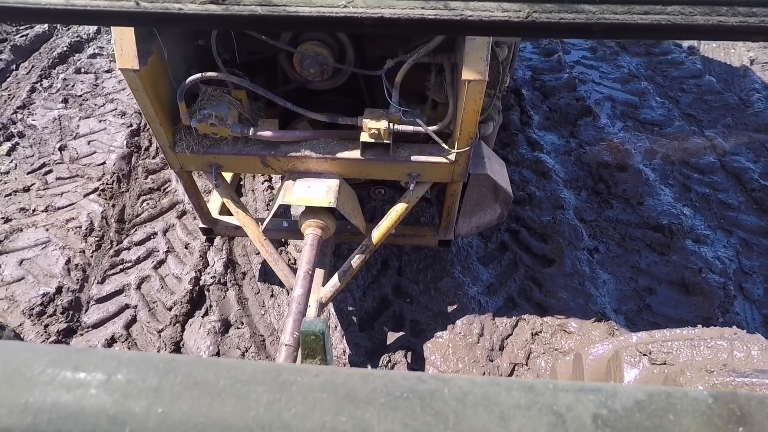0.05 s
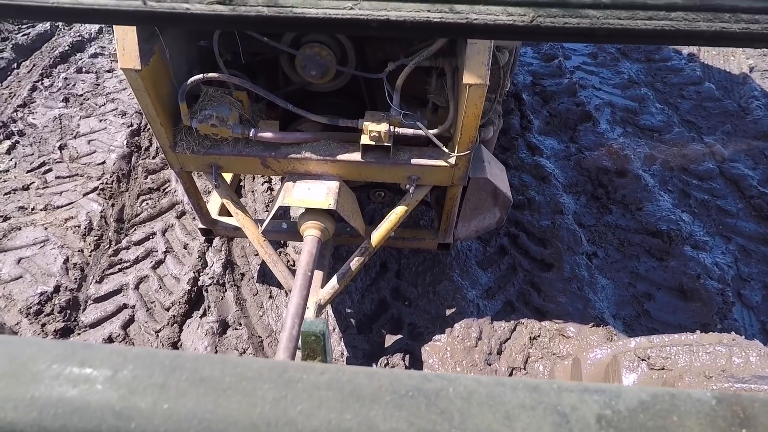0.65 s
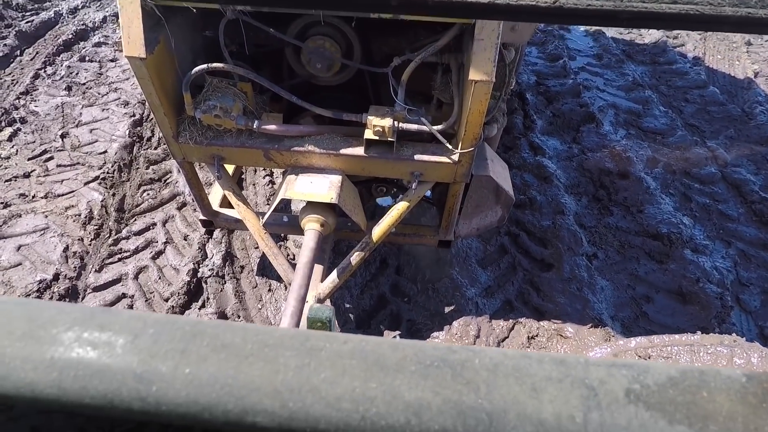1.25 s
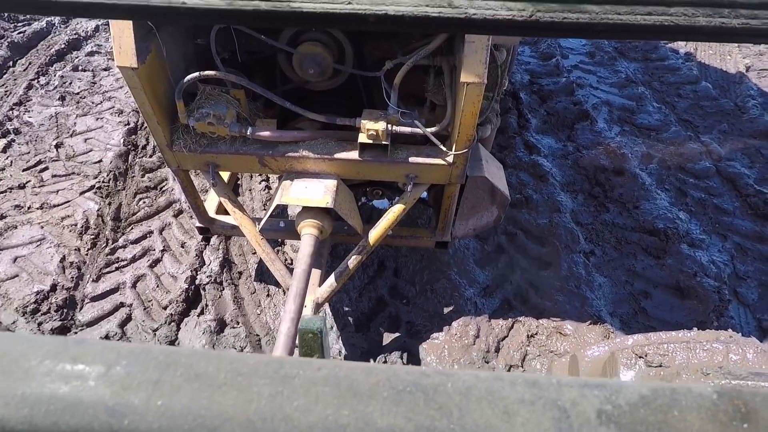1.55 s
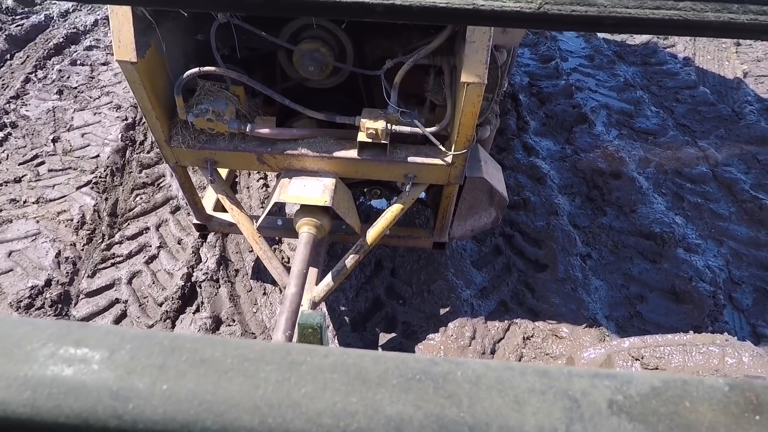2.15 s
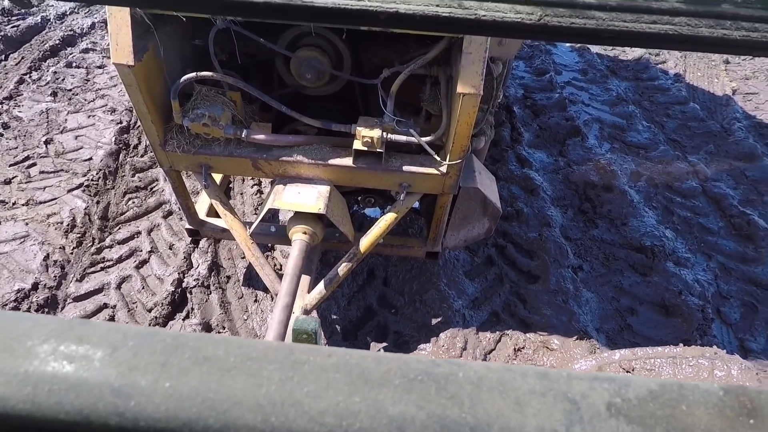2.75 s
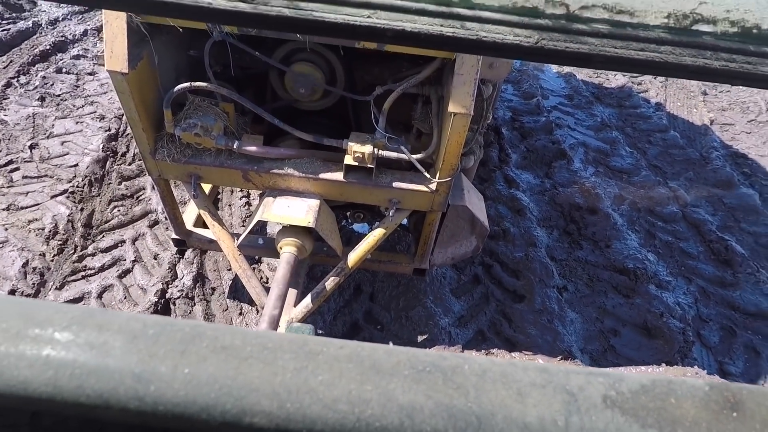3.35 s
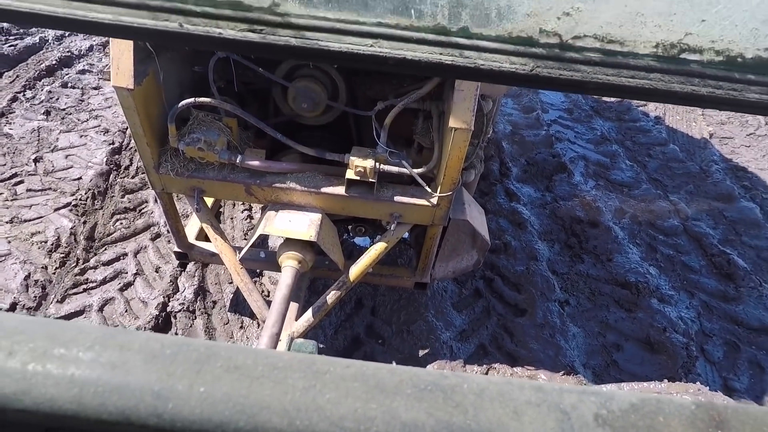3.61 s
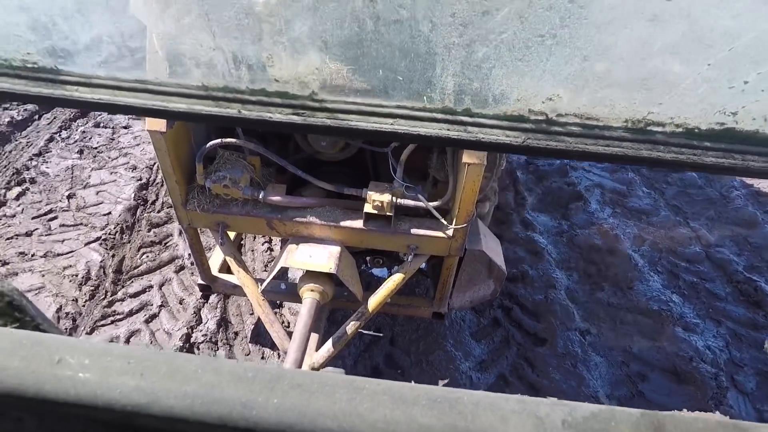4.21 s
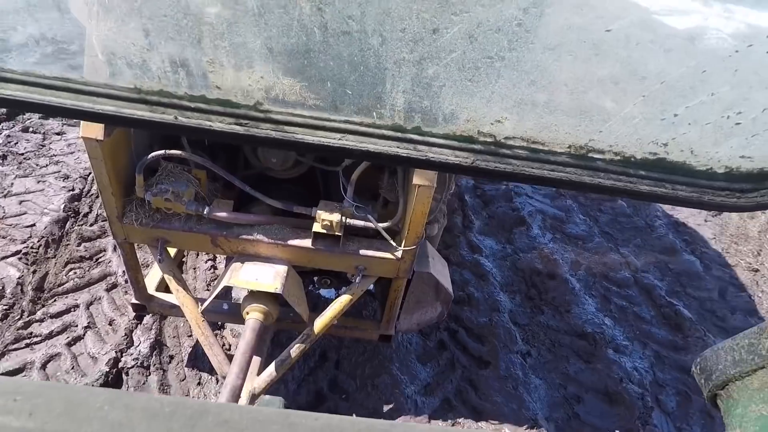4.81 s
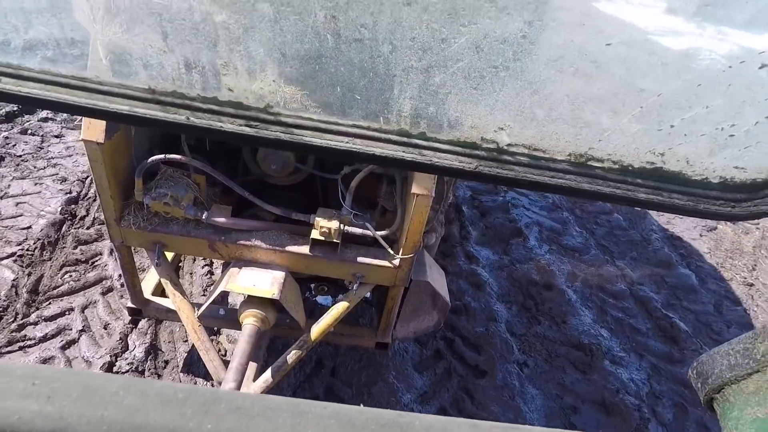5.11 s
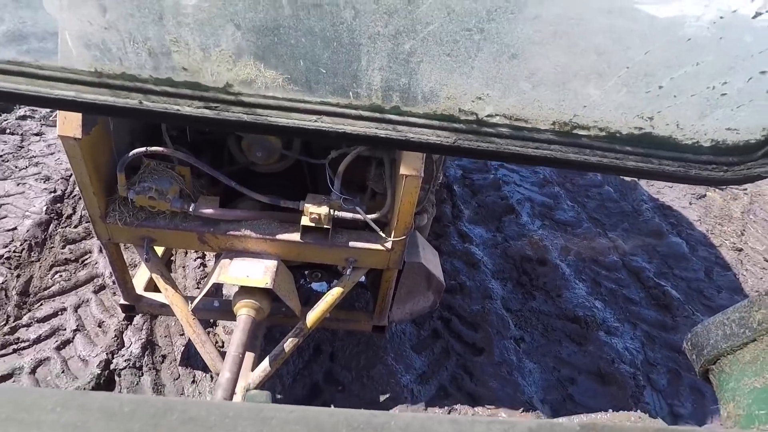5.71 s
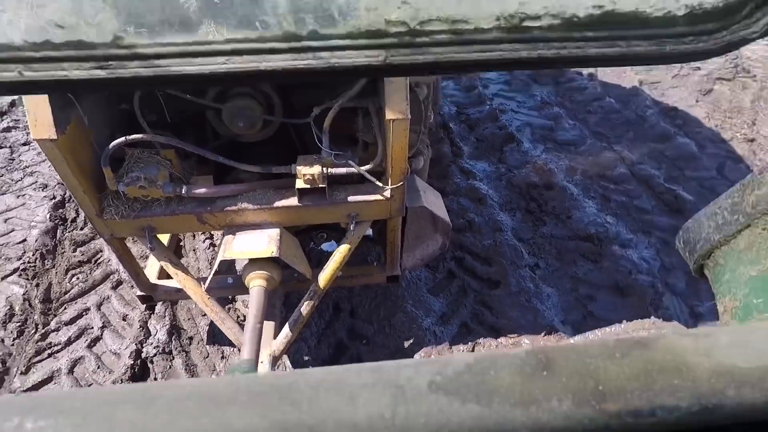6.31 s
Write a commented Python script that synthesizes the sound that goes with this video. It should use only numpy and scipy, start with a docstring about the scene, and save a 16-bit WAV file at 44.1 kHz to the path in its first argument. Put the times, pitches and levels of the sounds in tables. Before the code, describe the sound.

From inside an open-windowed tractor cab, a low diesel drone with fan hum and gear whine labours under the load of a hay grinder. Bursts of crackling chaff and sharp clinks hit the steel housing over a light hiss. Halfway through, the engine dips and picks up again as a rapid, pulsing metal rub sets in. Finally the engine is revved, and the whine and rubbing grow louder.

```python
"""Tractor cab, rear window open: a six-cylinder diesel drives a hay grinder.
The engine sags under load while its turbo winds up, recovers, then is revved. Its orders boom in the
cab, its firings shake panels and block; gear teeth whine and the cooling fan hums.
Hay hisses in the mill; stalks and hard bits crack and clink against the steel.
From halfway on, a turning part of the grinder rubs on its guard once a turn."""
import sys
import numpy as np
from scipy import signal
from scipy.fft import rfft, irfft
from scipy.io import wavfile

SR = 44100
rng = np.random.default_rng(int(sys.argv[2]) if len(sys.argv) > 2 else 0)


def master(y):
    """Save y as 16-bit WAV."""
    cut = np.clip(np.atleast_2d(y).T, -1, 1)
    pcm = np.round(cut * 32767)  # scale
    wavfile.write(sys.argv[1], SR, pcm.astype(np.int16))


N = 284886
T = np.arange(N) / SR

# cab panel spectrum (frequency [Hz], relative level [dB])
CAB_SPECTRUM = [(120, -29), (190, -5.5), (225, 1), (255, -2.5), (310, 2), (355, -4), (440, -7.5),
                (510, -8.5), (580, -20), (900, -30.5), (3000, -70.5)]
# cab resonances (centre [Hz], width [Hz], lift [dB])
CAB_MODES = [(436.5, 30, 2.5), (605, 30, -2), (276, 73, 0.5)]
# grinder housing resonances (centre [Hz], width [Hz], lift [dB])
HOUSING_MODES = [(2658, 90, 4), (3390, 130, 1.5), (3660, 200, -4), (4490, 140, 1), (5470, 280, -3.5),
                 (6000, 74, 5), (7700, 180, 4), (10400, 400, 5.5)]


def exhaust(firing_hz, free_hz=70.74, fade_db_per_hz=2.0, waver_db=1.08):
    """Low engine orders sweep through the cab's resonances; unequal cylinders add half orders."""
    # engine orders (multiple of firing rate)
    orders = [.5, 1, 1.5, 2, 3]
    # strength per order (relative level [dB])
    orders_db = [2.5, 1, -3, -0.5, -9.5]
    # cab boom response (frequency [Hz], gain [dB])
    boom = [(34, -22.5), (47, -33.5), (58, -13.5), (67.5, -25), (73, -15), (88, -16.5), (97, -23),
            (118, -22.5), (129, -14.5), (136, -17), (144, -27.5), (172, -28.5), (190, -19.5), (280, -31)]
    firings, drone = turns_of(firing_hz), np.zeros(N)
    # half orders fade when the engine is dragged below its free speed
    fade_db = np.clip(fade_db_per_hz * (free_hz - firing_hz), 0, 23)
    for k, order_db in zip(orders, orders_db):
        db = order_db + np.interp(k * firing_hz, *np.transpose(boom)) - (fade_db if k % 1 else 0)
        gain = np.sqrt(2) * amp(db + waver_db * wander(4.7))
        drone += gain * np.cos(2 * np.pi * (k * firings + rng.random()))
    return drone


def combustion(firing_hz, effort_db, roar_depth=0.17, clatter_depth=0.13, uneven_db=-0.25):
    """Each firing puffs noise into the cab panels and knocks the block, over a steady rumble."""
    # panel roar by speed (firing rate [Hz], level [dB])
    roar_by_speed = [(57, -20.5), (64, -20), (72, -16), (86, -17), (95, -19.5)]
    # block clatter and rumble spectra (frequency [Hz], relative level [dB])
    clatter_spectrum = [(350, -30.5), (560, -1), (700, 5.5), (800, -4), (1000, -1.5), (1150, 0.5),
                        (1350, -3), (1500, -5), (1800, -9), (2400, -21), (5000, -44.5), (15000, -72)]
    rumble_spectrum = [(8, -51.5), (25, -0.5), (45, -3.5), (80, -10.5), (150, -0.5), (220, -11),
                       (400, -27.5), (900, -66)]
    # block resonances (centre [Hz], width [Hz], lift [dB])
    block_modes = [(1266.5, 59, 8), (1138, 34, 3.5), (1006, 13, 5.5), (700, 54, -3), (608, 32, -5),
                   (1547, 80, -4.5)]
    firings = turns_of(firing_hz)
    crank_turns = firings / 3
    cylinder_gain = amp(uneven_db * (np.cos(2 * np.pi * crank_turns) + np.sin(np.pi * firings)))
    beat = np.cos(2 * np.pi * firings)
    puffs = rng.standard_normal(N) * cylinder_gain * (1 + roar_depth * beat)
    roar_db = np.interp(firing_hz, *np.transpose(roar_by_speed))
    roar = amp(roar_db) * unit(colour(puffs, CAB_SPECTRUM, CAB_MODES))
    one_turn = rng.standard_normal(2048)  # part of the knock repeats every crank turn
    repeating = one_turn[(crank_turns % 1 * len(one_turn)).astype(int)]
    knocks = (rng.standard_normal(N) + amp(-8) * repeating) * cylinder_gain * (1 + clatter_depth * beat)
    clatter = amp(effort_db - 3) * unit(colour(knocks, clatter_spectrum, block_modes))
    rumble = amp(-22) * colour(rng.standard_normal(N), rumble_spectrum)
    return roar + clatter + rumble


def throb(shaft_hz, depth_db=0.73, peak_turn=0.11):
    """Gain swing: the unbalanced grinder shaft loads the engine once a turn."""
    return amp(depth_db * np.cos(2 * np.pi * (turns_of(shaft_hz) - peak_turn)))


def hay(firings, effort_db, contact, trickle_db=-58, shaken_db=-49, edge_s=0.025):
    """The mill hisses; chaff ticks on the housing in clumps, thickest while a wad goes through."""
    # wads of coarse hay (start [s], length [s], chaff level [dB])
    wads = [(0.725, 0.41, -41), (1.355, 0.32, -47), (1.792, 0.27, -43), (3.6, .5, -57)]
    # mill hiss and chaff tick spectra (frequency [Hz], relative level [dB])
    hiss_spectrum = [(1000, -27.5), (2000, -4.5), (2700, 2.5), (3800, -6), (4600, -7), (5400, -11.5),
                     (6500, -21), (8000, -26), (11000, -37.5), (15000, -39.5)]
    tick_spectrum = [(1500, -11.5), (3000, 8), (4500, 6), (6500, -3.5), (7300, -29), (11000, -26.5),
                     (15000, -39.5)]
    chaff_gain = amp(trickle_db) + amp(shaken_db) * contact  # rubbing shakes more loose
    for start_s, length_s, db in wads:
        inside_s = np.minimum(T - start_s, start_s + length_s + edge_s - T)
        chaff_gain += amp(db) * np.clip(inside_s / edge_s, 0, 1)
    beat = 1 + 0.036 * np.cos(2 * np.pi * firings)
    rush = unit(rng.standard_normal(N) * amp(0.5 * wander(35)) * beat)
    ticks = unit(grains(per_s=2800, spread_db=3) * amp(3 * wander(34)))
    hiss = colour(amp(effort_db - 11) * rush, hiss_spectrum, HOUSING_MODES)
    chaff = colour(chaff_gain * ticks, tick_spectrum, HOUSING_MODES)
    return sheet_steel(hiss + chaff, ring_db=-13.5, t60_s=0.048)


def strikes(rise_s=0.0013, t60_s=0.076, thud_db=6):
    """Hard bits hit the housing in a shower of blows, thud through the cab and clink as they skitter."""
    # hard bits (time [s], relative crack level [dB], relative clink level [dB], clink pitch [Hz])
    hits = [(.734, -37, -44, 6170), (.814, -39, -36, 5300), (.897, -29, -36.5, 6130),
            (.992, -42, -35, 4550), (1.088, -37, -46, 6160), (1.233, -31.5, -45, 6400),
            (1.374, -30, -38, 4550), (1.44, -23, -33, 4400), (1.582, -33, -44, 5900),
            (1.617, -40, -42, 4530), (1.85, -20.5, -44, 4500), (1.877, -33, -43, 6050),
            (1.931, -31, -38, 4430), (2.013, -22.5, -37, 4520), (2.018, -28.5, -34, 6160),
            (3.156, -26.5, -41, 5700), (3.19, -32, -37, 4170), (3.348, -26, -39, 4550),
            (3.635, -38, -32, 4420), (3.779, -40, -36, 4450), (3.93, -43, -35, 4820),
            (3.988, -35, -35, 4500), (4.059, -39, -29, 4800)]
    # modes of a bit (multiple of pitch, relative level [dB], t60 [s])
    clink_modes = [(.74, -1, 0.011), (.89, 0, 0.023), (1, 2, 0.036), (1.06, -2, 0.021)]
    # crack spectrum (frequency [Hz], relative level [dB])
    crack_spectrum = [(300, -14), (1200, 13), (2000, -7), (2900, 5), (3700, -3), (4600, 0.5), (6300, -10),
                      (7500, -21), (11000, -20), (15000, -19.5)]
    cracks, clinks, t = np.zeros(N), np.zeros(N), T[:SR // 4]
    blows = grains(per_s=6400, spread_db=0)
    for start_s, crack_db, clink_db, hz in hits:
        span = slice(round(start_s * SR), round(start_s * SR) + len(t))
        shower = blows[span] * amp(-60 * t / t60_s) * (1 - np.exp(-t / rise_s))
        ring = sum(amp(db - 60 * t / mode_t60_s) * np.sin(2 * np.pi * ratio * hz * t)
                   for ratio, db, mode_t60_s in clink_modes)
        ring /= np.linalg.norm(ring)
        cracks[span] += amp(crack_db) * shower
        clinks[span] += amp(clink_db + 3) * signal.fftconvolve(shower, ring)[:len(t)]
    housing = sheet_steel(colour(cracks, crack_spectrum, HOUSING_MODES), ring_db=2, t60_s=0.07)
    thuds = amp(thud_db) * colour(cracks, CAB_SPECTRUM, CAB_MODES)
    return housing + thuds + clinks


def rubbing(shaft_hz, speed_octaves, contact, uneven_db=2.0):
    """Steel sizzles over a guard once a turn; the guard rattles on between. Both grow with speed."""
    # rub over one turn (position [turns], relative level [dB])
    rub_cycle = [(0, 0.5), (.07, -0.5), (.15, -3), (.24, 3), (.37, -10), (.55, -13), (.71, -13), (.77, -1),
                 (.86, 0), (1, 2.5)]
    # sizzle and rattle spectra (frequency [Hz], relative level [dB])
    sizzle_spectrum = [(3000, -23.5), (6000, -1), (8000, -2.5), (10000, -2), (12500, -1), (13500, 3.5),
                       (15000, -2)]
    rattle_spectrum = [(1200, -24), (2500, -2.5), (3600, 4), (4700, 0.5), (5300, -14.5), (7000, -23),
                       (10000, -32), (15000, -46.5)]
    # guard resonances (centre [Hz], width [Hz], lift [dB])
    guard_modes = [(2820, 130, 4.5), (3040, 170, -21), (3530, 100, 6.5), (4160, 150, 7.5), (4640, 93, 13.5),
                   (7200, 200, -1.5), (9930, 130, 1), (10260, 120, 5), (12300, 180, 7.5), (13800, 700, -10)]
    rattle_db, sizzle_db = -42.5 + 7.5 * speed_octaves, -51 + 20 * speed_octaves
    stroke_db = np.interp(turns_of(shaft_hz) % 1, *np.transpose(rub_cycle)) + uneven_db * wander(45)
    shake = unit(amp(0.54 * stroke_db)) * grains(per_s=5000, spread_db=-0.5)
    slips = unit(amp(stroke_db)) * grains(per_s=13000, spread_db=3.5)
    rattle = colour(shake, rattle_spectrum, guard_modes)
    sizzle = sheet_steel(colour(slips, sizzle_spectrum, guard_modes), ring_db=-11, t60_s=0.05)
    bite = sets_in(mid_s=2.95, ease_s=0.12)
    return contact * amp(rattle_db) * rattle + bite * amp(sizzle_db) * sizzle


def gear(shaft_hz, speed_octaves, teeth=22, waver_db=2, jitter_rad=0.5):
    """Meshing teeth whine in step with the uneven grinder shaft, louder with speed."""
    # mesh harmonics 1-3 (relative level [dB], once-a-turn phase swing [rad])
    harmonics = [(-1.5, 0.83), (-23, 0.55), (-19.5, 2.1)]
    level_db = -29.5 + 15.5 * speed_octaves
    shaft_rad = 2 * np.pi * turns_of(shaft_hz)
    whine = np.zeros(N)
    for k, (db, swing_rad) in enumerate(harmonics, 1):
        phase = k * teeth * shaft_rad + swing_rad * np.sin(shaft_rad) + jitter_rad * wander(12)
        whine += np.sqrt(2) * amp(level_db + db + waver_db * wander(15)) * np.sin(phase)
    return whine


def fan(waver_db=1.0):
    """Blade tone of the cooling fan, which lags behind the engine."""
    # fan tone (time [s], pitch [Hz], level [dB])
    blade_tone = [(0, 209, -19), (.55, 196.7, -20), (1.45, 194.5, -20), (2.7, 185, -24.5),
                  (3.05, 173.3, -35.5), (3.9, 197.3, -20.5), (5.1, 205.6, -24), (5.95, 219, -19),
                  (6.46, 232, -24)]
    hz, db = curves(blade_tone)
    return np.sqrt(2) * amp(db + waver_db * wander(9)) * np.sin(2 * np.pi * turns_of(hz))


def turbo(width_hz=520):
    """The turbocharger's thin, fuzzy whistle climbs while the engine labours."""
    # turbo whistle (time [s], pitch [Hz], level [dB])
    whistle = [(0, 5700, -68), (.55, 6280, -71), (1.2, 8100, -87), (2.2, 9550, -65), (2.7, 10500, -64),
               (3.5, 10850, -69), (4.5, 8400, -82), (5.3, 9550, -71), (5.9, 12400, -68)]
    hz, db = curves(whistle)
    phase = 2 * np.pi * turns_of(hz)
    return amp(db) * (wander(width_hz / 2) * np.cos(phase) + wander(width_hz / 2) * np.sin(phase))


def sheet_steel(x, ring_db, t60_s):
    """A steel panel's many close modes add a short metallic ring."""
    t = T[:SR // 8]
    ring = rng.standard_normal(len(t)) * amp(-60 * t / t60_s)
    ringing = signal.oaconvolve(x, ring / np.linalg.norm(ring))[:N]
    return (x + amp(ring_db) * ringing) / np.hypot(1, amp(ring_db))


def colour(x, spectrum, modes=()):
    """Minimum-phase filter: smooth spectrum plus resonances; keeps the power of white noise."""
    size = 8192
    f = abs(np.fft.fftfreq(size, 1 / SR))
    hz, level_db = np.transpose(spectrum)
    db = np.interp(np.log(f + 1), np.log(hz), level_db)
    for centre_hz, width_hz, lift_db in modes:
        db += lift_db / (1 + (2 * (f - centre_hz) / width_hz) ** 2)
    log_response = np.conj(signal.hilbert(np.log(amp(db))))
    impulse = np.fft.ifft(np.exp(log_response)).real[:size // 2]
    return signal.oaconvolve(x, impulse / np.linalg.norm(impulse))[:N]


def grains(per_s, spread_db):
    """Random clicks, unit rms; spread_db makes their sizes unequal."""
    size = amp(spread_db * np.minimum(rng.exponential(1, N), 4))
    return unit(size * rng.choice([-1, 1], N) * (rng.random(N) < per_s / SR))


def wander(hz):
    """Smooth noise up to about hz, unit rms."""
    f = np.fft.rfftfreq(N, 1 / SR)
    return unit(irfft(rfft(rng.standard_normal(N)) * np.exp(-.5 * (f / hz) ** 2), N))


def sets_in(mid_s, ease_s):
    """Smooth step from 0 to 1."""
    return 1 / (1 + np.exp((mid_s - T) / ease_s))


def curves(table):
    """Columns of a timed table, per sample."""
    times_s, *columns = np.transpose(table)
    return [np.interp(T, times_s, column) for column in columns]


def turns_of(hz):
    """Cycles completed at a changing rate."""
    return np.cumsum(hz) / SR


def amp(db):
    """dB to gain."""
    return 10 ** (np.asarray(db) / 20)


def unit(x):
    """Scale to unit rms."""
    return x / np.sqrt(np.mean(x ** 2) + 1e-20)


def scene(shaft_turns_per_firing=0.2134, working_hz=67):
    """Engine speed and effort drive tractor and grinder; rubbing sets in halfway."""
    # engine speed (time [s], firing rate [Hz])
    speed = [(0, 68.38), (.2, 67.46), (.45, 64.64), (1, 64.8), (2.4, 62), (2.8, 59.96), (3.05, 56.66),
             (3.55, 65.8), (3.8, 67), (5.05, 67.8), (5.2, 70.3), (6.2, 94), (6.46, 94.8)]
    # machine effort, sets block clatter and hay hiss (time [s], relative level [dB])
    effort = [(.33, -30.5), (.55, -27), (1.55, -27), (2, -30), (2.15, -31), (2.7, -30.5), (3.05, -36),
              (3.8, -31), (4.9, -31), (5.25, -27.5), (6.1, -33), (6.46, -31)]
    (firing_hz,), (effort_db,) = curves(speed), curves(effort)
    shaft_hz = shaft_turns_per_firing * firing_hz
    speed_octaves = np.log2(firing_hz / working_hz)
    contact = sets_in(mid_s=3.02, ease_s=0.3)  # the turning part comes to bear on its guard
    tractor = exhaust(firing_hz) + throb(shaft_hz) * combustion(firing_hz, effort_db) + fan() + turbo()
    drive = gear(shaft_hz, speed_octaves) + rubbing(shaft_hz, speed_octaves, contact)
    mill = hay(turns_of(firing_hz), effort_db, contact) + strikes()
    return (tractor + drive + mill)[None]


def record(dry):
    """Soft clip, then low-pass."""
    ceiling, cutoff_hz = 0.95, 15350
    rounded = dry / (1 + (dry / ceiling) ** 8) ** (1 / 8)
    lowpass = signal.firwin(511, cutoff_hz, window=("kaiser", 9), fs=SR)
    return signal.oaconvolve(rounded, lowpass[None], "same")


dry = scene()
out = record(dry)
master(out)
```